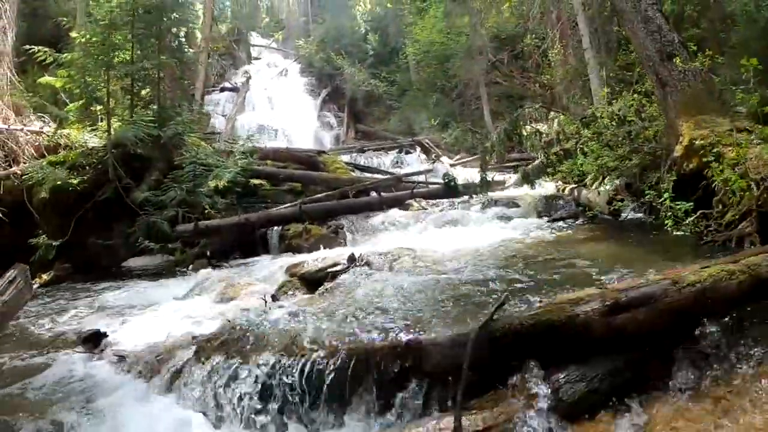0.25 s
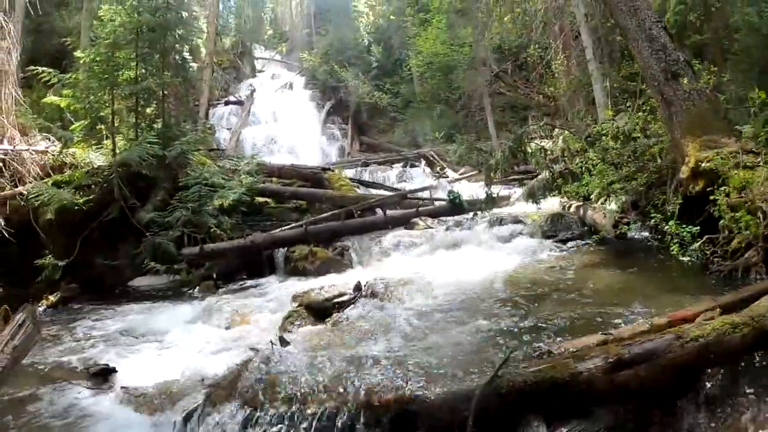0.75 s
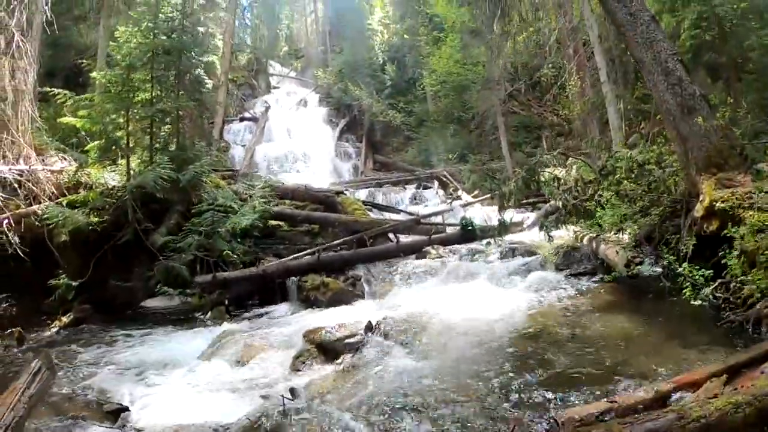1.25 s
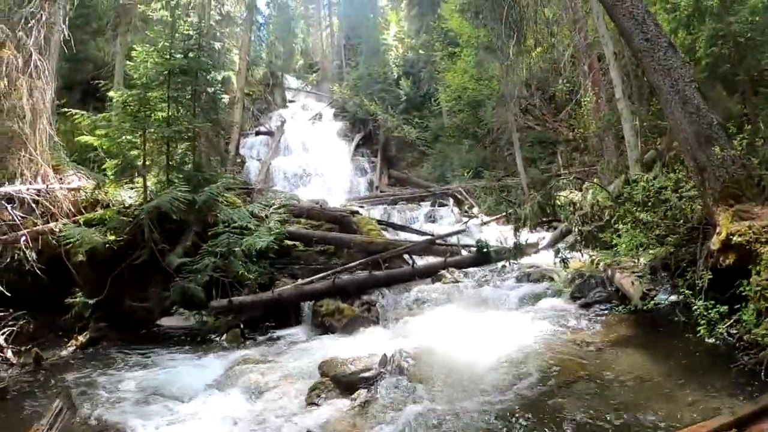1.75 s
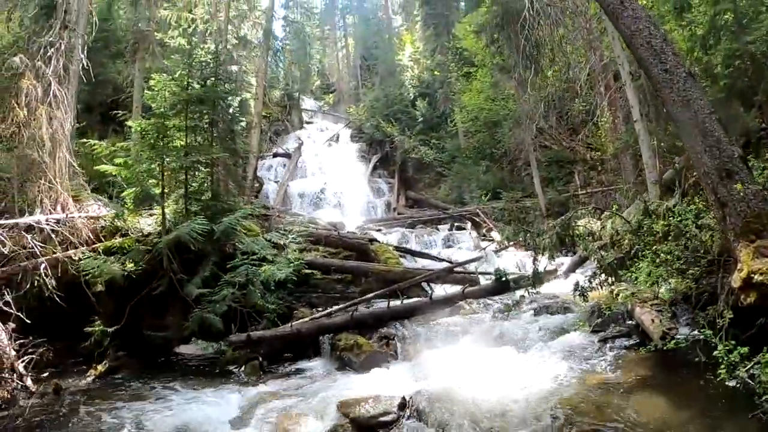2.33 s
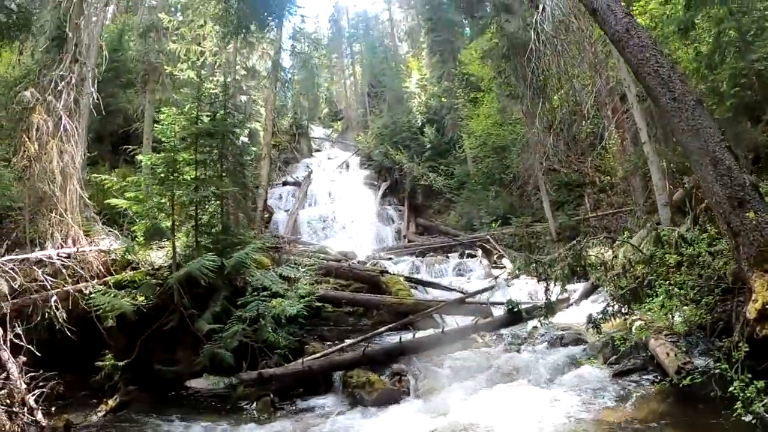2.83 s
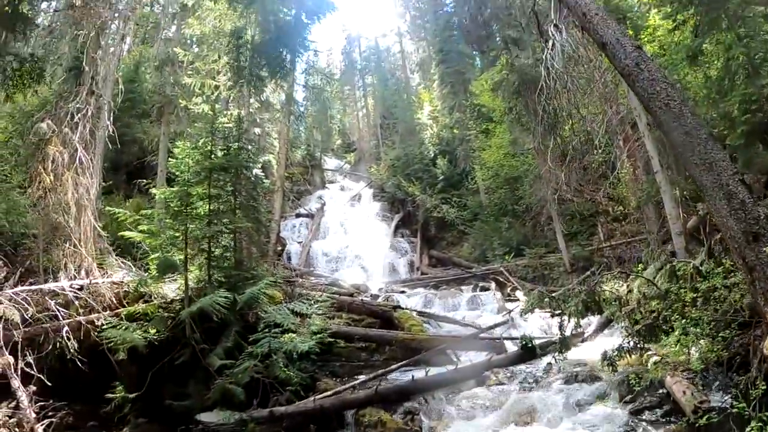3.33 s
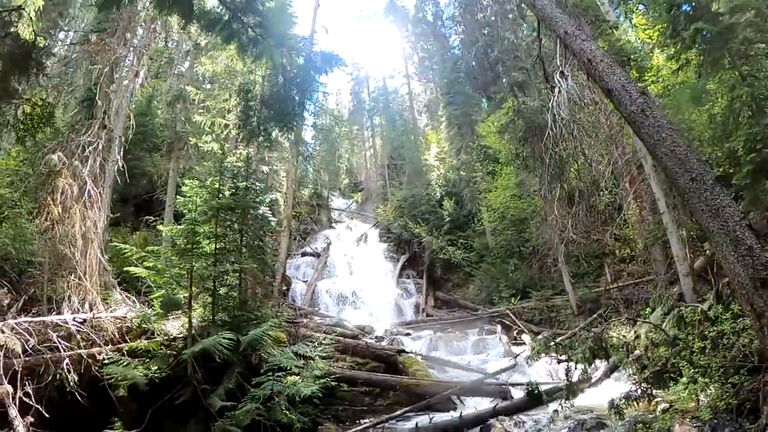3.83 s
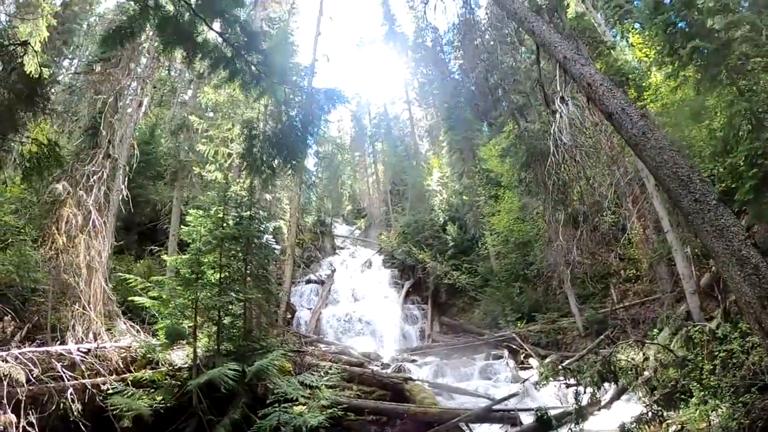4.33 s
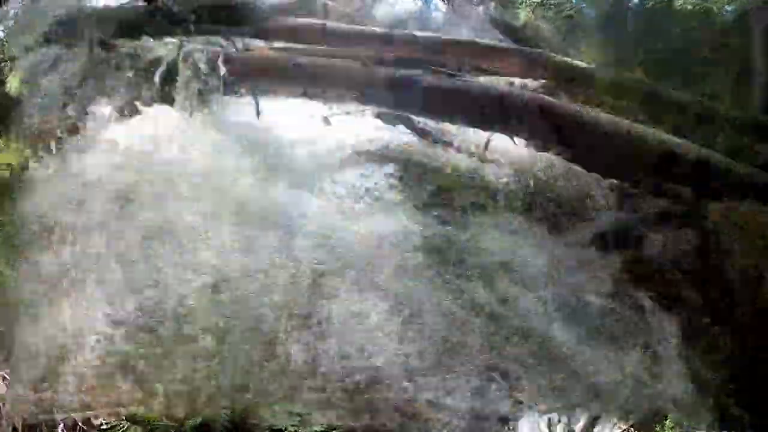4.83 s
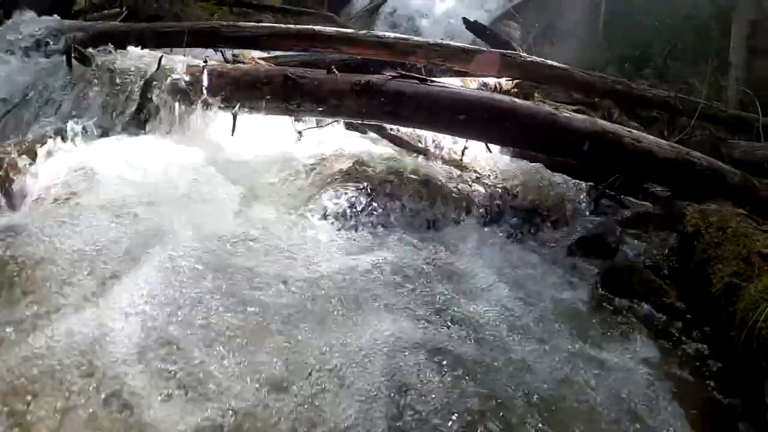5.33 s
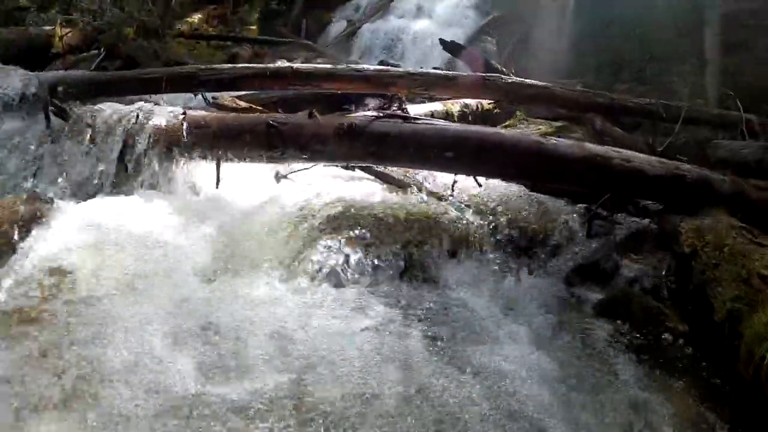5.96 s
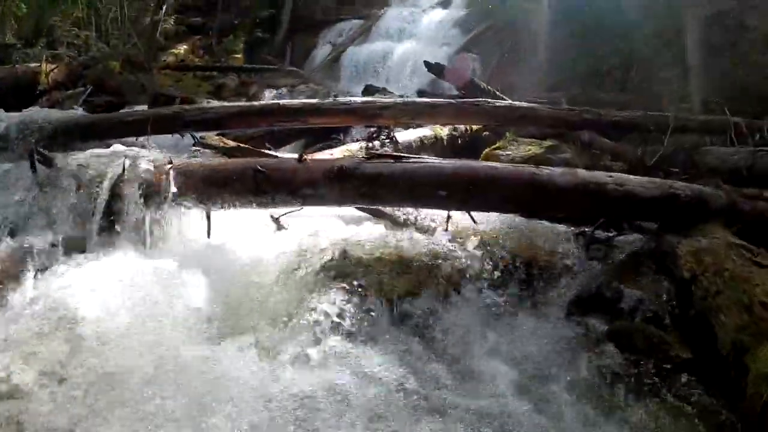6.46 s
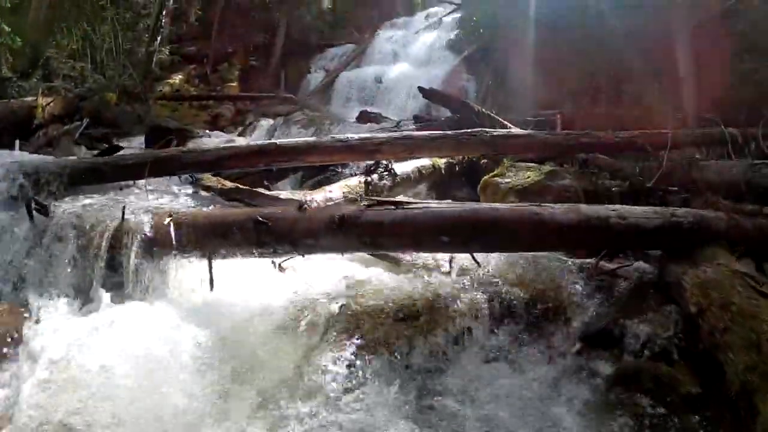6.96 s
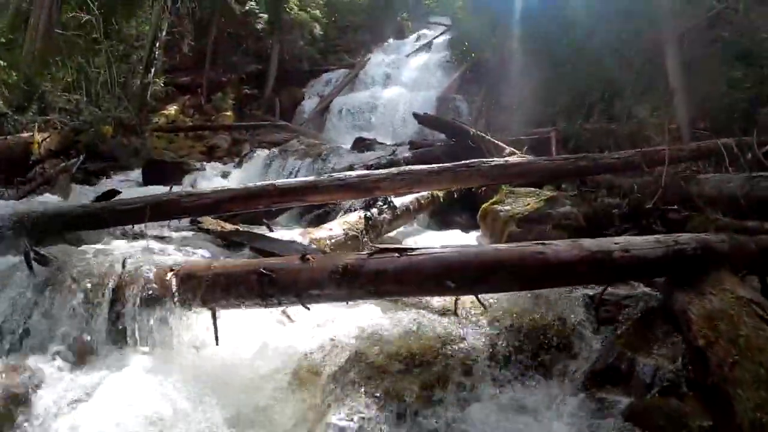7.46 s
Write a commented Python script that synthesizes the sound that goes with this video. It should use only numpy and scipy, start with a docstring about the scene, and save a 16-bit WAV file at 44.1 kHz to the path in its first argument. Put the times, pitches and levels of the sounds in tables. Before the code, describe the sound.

A rushing creek roars, muffled and hollow at first, then abruptly opens into bright, close white water with splashes and glugs.

```python
"""First a dull, hollow roar: a mountain creek below a waterfall, heard through the sealed microphone
port of a small camera. Its ring near 480 Hz swells into brief booms, and air buffets the camera body.
The roar fades, and the sound opens abruptly at a second place, beside a cascade pouring between logs.
Here the open microphone hears a bright rush with ringing bubbles, fine spray and close splashes,
while clouds of trapped air throb and large bubbles glug in the plunge pool."""
import sys
import numpy as np
from scipy import signal
from scipy.fft import rfft, irfft, next_fast_len
from scipy.io import wavfile
from scipy.ndimage import uniform_filter1d

SR = 44100
rng = np.random.default_rng(int(sys.argv[2]) if len(sys.argv) > 2 else 0)


def wav_out(sig):
    """Save sig, one row per channel (or a flat mono array), as 16-bit PCM at SR to the path in sys.argv[1]."""
    wavfile.write(sys.argv[1], SR, np.round(np.clip(np.atleast_2d(sig).T, -1, 1) * 32767).astype(np.int16))


N = 339129
MOVE_S = 4.868  # the microphone changes place, from the far creek to the cascade
TIME = np.arange(N) / SR
NEAR_TIME = TIME - MOVE_S  # seconds since arriving at the cascade
FRAME_S, BIN_HZ = np.arange(N // 256 + 5) * 256 / SR, np.fft.rfftfreq(1024, 1 / SR)


# thin splashing on a log near the first place: (frequency [Hz], relative level [dB])
LOG_SPLASH = [(2000, -11), (3300, 3.5), (4500, -1.5), (5500, -1.5), (6300, 2.5), (7400, 0),
              (8800, -2), (10200, -12.5), (15000, -26)]
def muffled_creek(roar_db=-18.5, hiss_db=-50.5, splash_db=-72.5, gurgle_db=-14):
    """First place: the creek's wash and gurgle behind the sealed port, and a thin splash from a log."""
    wash = noise(patches(frames=8, bins=12))
    gurgle = bubbles(per_s=500, lo_hz=667, hi_hz=2860, cycles=4.4, spread_db=0.5, rise=0.027, sizes=16)
    roar, hiss = split(sealed_port(wash + amp(gurgle_db) * gurgle), hz=730)
    roar = steadied(roar, share=0.69, samples=3500)
    # the camera tilts up from the water and the creek recedes, each layer at its own dB per second
    roar *= amp(roar_db - 0.67 * TIME) / np.std(band(roar, 210, 820))
    hiss *= amp(hiss_db - 0.79 * TIME) / np.std(band(hiss, 1474, 4000))
    splash = noise(spectrum(LOG_SPLASH, BIN_HZ) + 2.5 * patches(frames=3, bins=40))
    splash *= amp(splash_db - 2.1 * TIME)
    return booming(roar) + hiss + splash


# the creek through the seal, resonances aside: (frequency [Hz], relative level [dB])
SEALED_SPECTRUM = [(12, -5), (35, -1), (70, -3.5), (115, 0.5), (200, -2.5), (380, -0.95), (600, -7),
                   (800, -15.5), (1450, -28), (2400, -39.5), (3200, -49), (5500, -56.5), (9300, -66),
                   (10300, -70.5), (13000, -85)]
# the port's peaks and notches: (frequency before tuning [Hz], width [Hz], lift [dB], lift change [dB/s])
PORT_MODES = [(480.7, 67, 16.5, 0.27), (1043, 220, -8, 1), (1197, 94, 7.5, -0.12), (4430, 320, 0.5, 2),
              (5550, 550, -1.5, 0.1), (6200, 1200, 2.5, 0), (7400, 900, -2.5, 0.5)]
def sealed_port(water, start_tuning=0.99, creep=0.05):
    """The sealed microphone port rings and swallows the treble; its lower modes creep up in pitch."""
    drift = start_tuning + creep * (TIME / MOVE_S) ** 4.5 * (TIME < MOVE_S)
    for hz, width, db, db_per_s in PORT_MODES:
        tuning = np.where(hz < 2000, drift, 1)
        water = water + (amp(db + db_per_s * TIME) - 1) * resonate(water, hz * tuning, width)
    return colour(water, lambda hz: spectrum(SEALED_SPECTRUM, hz))


# brief booms in the roar's hollow ring: (time [s], peak level [dB], half length [s], pitch [Hz])
RING_BOOMS = [(0.041, -11, 0.0079, 462), (0.145, -10, 0.0094, 449), (0.249, -9, 0.0078, 478),
              (0.289, -12, 0.015, 474), (0.362, -10.5, 0.0073, 457), (0.477, -13, 0.0084, 470),
              (0.556, -13.5, 0.013, 473), (0.68, -7, 0.011, 459), (0.73, -10, 0.0053, 465),
              (0.777, -10.5, 0.014, 476), (0.925, -7.5, 0.0092, 464), (1.059, -9, 0.011, 443.5),
              (1.152, -12, .009, 462), (1.453, -11, 0.0084, 465), (1.559, -9.5, 0.0077, 463),
              (1.646, -9.5, 0.012, 462), (1.764, -10, 0.014, 457), (1.821, -10, 0.01, 477),
              (1.881, -10, 0.01, 458), (1.957, -8, 0.0085, 461.3), (2.565, -7.5, 0.014, 458),
              (2.618, -9.5, 0.0072, 471), (2.863, -9, 0.0053, 448), (3.081, -10.5, 0.0073, 436),
              (3.663, -14, 0.026, 463), (3.857, -13.5, 0.02, 470), (3.965, -14, 0.013, 478),
              (4.004, -13, 0.021, 483), (4.129, -12.5, .011, 477), (4.22, -15.5, .024, 480),
              (4.31, -7, 0.0087, 479), (4.36, -12.5, 0.0072, 481), (4.626, -12, 0.01, 485),
              (4.708, -12.5, 0.012, 490)]
def booming(roar):
    """In each brief boom the roar's hollow ring swells into one round note."""
    ringing = band(roar, 430, 500)
    notes, takeover = np.zeros((2, N))
    for (s, db, half_s, hz), phase in zip(RING_BOOMS, rng.random(len(RING_BOOMS))):
        bell = np.exp(-((TIME - s) / half_s) ** 2)
        notes += amp(db) * bell * np.sin(2 * np.pi * (hz * TIME + phase))
        takeover += bell ** 1.2
    return roar - np.minimum(takeover, 1) * ringing + notes


# white water at close range: (frequency [Hz], relative level [dB])
CASCADE_SPECTRUM = [(15, -18), (60, -4), (130, 1), (400, 0.5), (700, -1.5), (1200, -3.5), (2500, -8.5),
                    (5000, -14), (7000, -14), (8500, -17), (10000, -27.5), (12000, -38.5), (15500, -52)]
# resonance of the open microphone: (frequency [Hz], width [Hz], lift [dB])
OPEN_MIC_PEAK = [(8020, 780, 7.5)]
# the cascade surges or slackens for a moment: (time [s], half length [s], lift [dB])
CASCADE_SURGES = [(5.1, 0.14, 0.5), (5.71, 0.022, 1.5), (6.18, 0.036, -1.4), (6.34, 0.052, 0.7),
                  (6.45, 0.074, -1.5), (7.5, 0.022, 0.5)]
def cascade(body_db=-18.5, fizz_db=-22, flicker_db=0.67, slosh_db=0.5, plop_db=-11, spray_db=-7):
    """Second place, microphone open: a churning wash with single bubbles and spray standing out of it."""
    wash = noise(flicker_db * patches(frames=3, bins=160) + slosh_db * patches(frames=16, bins=120))
    plops = bubbles(per_s=450, lo_hz=696.4, hi_hz=4580, cycles=12.3, spread_db=0.3, rise=0.029, sizes=28)
    spray = bubbles(per_s=1800, lo_hz=4050, hi_hz=12500, cycles=1.3, spread_db=1, rise=0.02, sizes=12)
    water = wash + amp(plop_db) * plops + amp(spray_db) * spray
    water = colour(water, lambda hz: spectrum(CASCADE_SPECTRUM, hz) + lift(OPEN_MIC_PEAK, hz))
    body, fizz = split(water, hz=2000)
    body = np.std(body) * steadied(body, share=0.38, samples=2500)
    # the rush brightens as the camera tilts up
    body *= amp(body_db - 0.37 * NEAR_TIME) / np.std(band(water, 556, 2250))
    fizz *= amp(fizz_db + 0.34 * NEAR_TIME) / np.std(band(water, 3140, 8600))
    return amp(swells(CASCADE_SURGES)) * (body + fizz)


# bubble clouds in the pool: (pitch on arrival [Hz], sag [Hz/s], width [Hz], relative level [dB])
BUBBLE_CLOUDS = [(284, 24, 72, 0), (132, -6, 42, -6)]
# the clouds swell as air is driven under, or ebb: (time [s], half length [s], lift [dB])
CLOUD_HEAVES = [(5.03, 0.06, 0.5), (5.44, 0.11, 4), (6.43, 0.08, -12), (6.7, 0.065, 3), (7.2, 0.2, 3.5)]
# low churning under them: (frequency [Hz], relative level [dB])
CHURN_SPECTRUM = [(20, -18), (55, 0), (90, -1), (175, -6.5), (380, -5), (520, -20), (1500, -60)]
def plunge_pool(cloud_db=-25, fall_db_per_s=1.56, throb_db=2.5, churn_db=-29.5):
    """At the foot of the cascade, clouds of trapped air pulse; the larger cloud sounds lower."""
    clouds = np.zeros(N)
    for hz, sag, width, db in BUBBLE_CLOUDS:
        pitch = hz - sag * (FRAME_S[:, None] - MOVE_S)
        detuning = 2 * (BIN_HZ - pitch) / width
        cloud = noise(-10 * np.log10(1 + detuning ** 4) + throb_db * patches(frames=8, bins=4))
        clouds += amp(db) * steadied(cloud, share=1, samples=3500)
    clouds *= amp(cloud_db - fall_db_per_s * NEAR_TIME + swells(CLOUD_HEAVES))
    churn = steadied(noise(spectrum(CHURN_SPECTRUM, BIN_HZ)), share=1, samples=3500)
    return clouds + amp(churn_db) * churn


# large bubbles in the pool: (time [s], peak level [dB], half length [s], pitch [Hz])
POOL_GLUGS = [(4.96, -18.5, 0.028, 142), (5.024, -17, 0.023, 270), (5.078, -17, 0.024, 259),
              (5.178, -19, 0.014, 220), (5.335, -21, 0.029, 252), (5.368, -21, .036, 91),
              (5.435, -15.5, .022, 283), (5.493, -18, .028, 263), (5.562, -20.5, .04, 225),
              (5.602, -17, 0.017, 305), (5.814, -18, .022, 217), (5.869, -19, .036, 246),
              (5.925, -19.5, .018, 145), (5.984, -19.5, .022, 232), (6.151, -20, .037, 274),
              (6.208, -19, 0.021, 221), (6.548, -20.5, .038, 208), (6.63, -18, 0.023, 217),
              (6.715, -19, 0.032, 142), (7.059, -19, 0.032, 221.7), (7.129, -20.5, .028, 253),
              (7.191, -17, .018, 228), (7.316, -19.5, .045, 221), (7.348, -17, .03, 154),
              (7.523, -18.5, 0.03, 208)]
def glugging(water, width_hz=45):
    """Each large bubble takes over from the churning at its own pitch and sounds one round note."""
    out = water.copy()
    for (s, db, half_s, hz), phase in zip(POOL_GLUGS, rng.random(len(POOL_GLUGS))):
        during = abs(TIME - s) < 3 * half_s
        t = TIME[during] - s
        note = amp(db) * np.sin(2 * np.pi * (hz * t + phase))
        churning = resonate(water[during], np.full(len(t), hz), width_hz)
        out[during] += np.exp(-(t / half_s) ** 2) * (note - churning)
    return out


# small splashes close to the microphone:
# (time [s], crest level [dB], pitch [Hz], bandwidth [share of pitch], rise [s], decay [s])
CLOSE_SPLASHES = [(0.99, -48, 1750, .35, .002, .004), (1.157, -52, 4000, .8, .0005, .0014),
                  (1.385, -42.5, 1950, .35, .002, .004), (5.043, -22, 2200, .7, .008, .012),
                  (5.051, -18.5, 6200, .15, .0006, .0016), (5.08, -24, 5500, .5, .003, .008),
                  (5.697, -18.5, 4800, .55, .003, .006), (5.73, -19, 1600, .6, .004, .006),
                  (5.977, -21, 2400, .6, .002, .007), (6.339, -19.5, 720, .2, .007, .008),
                  (6.344, -20, 2800, .7, .012, .014), (6.399, -19, 3700, .8, .008, .012),
                  (6.59, -21, 1400, .5, .006, .008), (6.665, -25, 5000, .5, .015, .012),
                  (6.879, -19.5, 3400, .3, .004, .007), (6.978, -19.5, 3250, .2, .002, .005),
                  (7.183, -19.5, 2750, .55, .013, .018), (7.21, -21, 5500, .4, .003, .006)]
# specks of spray that strike the open microphone: (time [s], crest level [dB])
MIC_SPECKS = [(5.149, -14), (5.217, -14), (5.474, -14), (5.763, -15), (6.997, -12.5), (7.0445, -15),
              (7.2379, -15), (7.3405, -22)]
def drops(speck_hz=8140, speck_width=0.14, speck_rise_s=0.00058, speck_decay_s=0.0019):
    """Each close splash or speck is a spit of noise: drops burst at once, sloshes swell first."""
    out, t = np.zeros(N), np.arange(-0.04, 0.07, 1 / SR)
    ticks = [(s, db, speck_hz, speck_width, speck_rise_s, speck_decay_s) for s, db in MIC_SPECKS]
    for s, db, hz, width, rise_s, decay_s in CLOSE_SPLASHES + ticks:
        envelope = np.exp(-np.where(t < 0, (t / rise_s) ** 2, t / decay_s))
        edges_hz = [hz / (1 + width), hz * (1 + width / 2)]
        bandpass = signal.butter(3, edges_hz, "bandpass", fs=SR, output="sos")
        spit = signal.sosfilt(bandpass, envelope * rng.standard_normal(len(t)))
        spit *= amp(db) * np.linalg.norm(envelope) / np.linalg.norm(spit)
        out[round((s + t[0]) * SR):][:len(t)] += spit
    return out


# gusts on the moving camera at the first place: (time [s], half length [s], lift [dB])
AIR_GUSTS = [(.62, .28, 10), (1.15, 0.13, 10), (4.15, 0.07, 9.5), (4.68, 0.23, 14)]
# their rumble at the microphone: (frequency [Hz], relative level [dB])
AIR_SPECTRUM = [(4, -15.5), (14, 1), (50, -7.5), (80, -16), (200, -35.5), (900, -88)]
def buffet(between_gusts_db=-45):
    """Low lumps of moving air on the camera body."""
    lumps = colour(rng.standard_normal(N), lambda hz: spectrum(AIR_SPECTRUM, hz))
    return amp(between_gusts_db + swells(AIR_GUSTS)) * steadied(lumps, share=0.7, samples=8000)


# moments when the near rush widens a little: (start [s], end [s], side level [dB])
WIDE_MOMENTS = [(4.915, 5.016, -45), (5.943, 6.614, -38.5), (7.032, 7.104, -37.5)]
# the rush at the sides: (frequency [Hz], relative level [dB])
SIDE_SPECTRUM = [(80, 3), (250, -12), (450, 1.5), (1000, -6), (3000, 1), (8400, 1), (9600, -6),
                 (11000, -55)]
def side_rush():
    """A faint rush that comes and goes at the sides of the stereo image."""
    gate = sum(amp(db) * ((TIME > start) & (TIME < end)) for start, end, db in WIDE_MOMENTS)
    return uniform_filter1d(gate, size=600) * noise(spectrum(SIDE_SPECTRUM, BIN_HZ))


def bubbles(per_s, lo_hz, hi_hz, cycles, spread_db, rise, sizes):
    """Bubbles of many sizes ring briefly, rising in pitch as they near the surface; a few are louder."""
    out = np.zeros(N)
    for hz in np.geomspace(lo_hz, hi_hz, sizes):
        life_s = cycles / hz
        t = np.arange(0, 3 * life_s, 1 / SR)
        ring = np.exp(-2 * t / life_s) * np.sin(2 * np.pi * hz * t * (1 + rise * t / life_s))
        when, force, polarity = rng.random((3, 1500))
        born = np.arange(len(when)) < per_s * N / SR / sizes
        level_db = spread_db * np.minimum(-np.log(1 - force), 4)
        kicks = np.bincount((when * N).astype(int), amp(level_db) * np.sign(polarity - 0.5) * born, N)
        out += hz * signal.oaconvolve(kicks, ring)[:N]  # equal energy per Hz over all sizes
    return unit(out)


def amp(db):
    """Decibels to gain."""
    return 10 ** (np.asarray(db) / 20)


def unit(x):
    """Scales to rms 1."""
    return x / np.sqrt(np.mean(x ** 2) + 1e-20)


def swells(rows):
    """Adds up bell-shaped swells of level, in dB."""
    return sum(db * np.exp(-((TIME - s) / half_s) ** 2) for s, half_s, db in rows)


def spectrum(points, hz):
    """A table of dB values, joined on a log-frequency axis."""
    point_hz, db = np.transpose(points)
    return np.interp(np.log(hz + 1), np.log(point_hz), db)


def lift(modes, hz):
    """The dB that a set of resonances adds at each frequency."""
    return sum(10 * np.log10(1 + (amp(db) ** 2 - 1) / (1 + (2 * (hz - centre) / width) ** 2))
               for centre, width, db in modes)


def colour(x, db_at):
    """Filters x by a gain in dB that is a function of frequency."""
    size = next_fast_len(N)
    gain = amp(db_at(np.fft.rfftfreq(size, 1 / SR)))
    return irfft(rfft(x, size) * gain, size)[:N]


def band(x, lo_hz, hi_hz):
    """The part of x between two frequencies."""
    return colour(x, lambda hz: -10 * np.log10((1 + (lo_hz / (hz + 1)) ** 20) * (1 + (hz / hi_hz) ** 20)))


def split(x, hz):
    """Low and high parts that add up to x."""
    low = colour(x, lambda f: -20 * np.log10(1 + (f / hz) ** 6))
    return low, x - low


def resonate(x, hz, width_hz):
    """Shifts the curve hz down to zero, smooths, and shifts back: a moving resonance of gain 1."""
    carrier = np.exp(2j * np.pi * np.cumsum(hz) / SR)
    pole = np.exp(-np.pi * width_hz / SR)
    return 2 * (carrier * signal.lfilter([1 - pole], [1, -pole], x / carrier)).real


def patches(frames, bins):
    """Random swells of rms 1, each some frames long and some bins wide."""
    field = rng.standard_normal((len(FRAME_S), len(BIN_HZ)))
    return unit(uniform_filter1d(uniform_filter1d(field, frames, axis=0), bins, axis=1))


def noise(db):
    """Noise of rms 1, shaped by a dB field over frames and bins."""
    real, imag = rng.standard_normal((2, len(FRAME_S), len(BIN_HZ)))
    spectra = (real + 1j * imag) * amp(db)
    return unit(signal.istft(spectra.T, nperseg=1024, noverlap=768)[1][:N])


def steadied(x, share, samples):
    """Evens out a share of the chance swells longer than the given samples; the result has rms 1."""
    power = abs(uniform_filter1d(x ** 2, samples)) + 1e-12
    return unit(x / power ** (share / 2))


def scene(fade_db=-7.5, fade_s=0.2, settle_db=-8, settle_s=0.021):
    """Two places in turn, nearly mono: the far creek sinks away, then the near cascade swells in."""
    far = muffled_creek() + buffet()
    near = glugging(cascade() + plunge_pool())
    opened = np.clip(NEAR_TIME / 0.001, 0, 1)
    fading = amp(fade_db * np.clip(1 + NEAR_TIME / fade_s, 0, 1) ** 2)
    settling = amp(settle_db * np.exp(-np.maximum(NEAR_TIME, 0) / settle_s))
    mid = (1 - opened) * fading * far + opened * settling * near + drops()
    side = side_rush()
    return np.array([mid + side, mid - side])


def record(dry):
    """The recorder's band limit, a steep cut at 15650 Hz."""
    lowpass = signal.firwin(511, 15650, window=("kaiser", 9), fs=SR)
    return signal.oaconvolve(dry, lowpass[None], "same")


dry = scene()
out = record(dry)
wav_out(out)
```